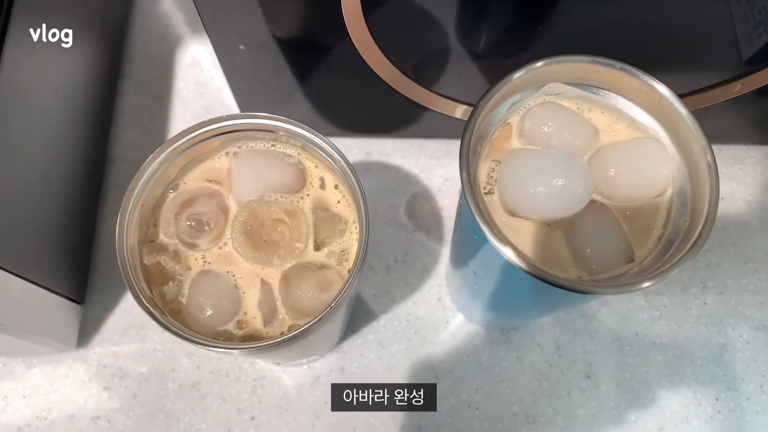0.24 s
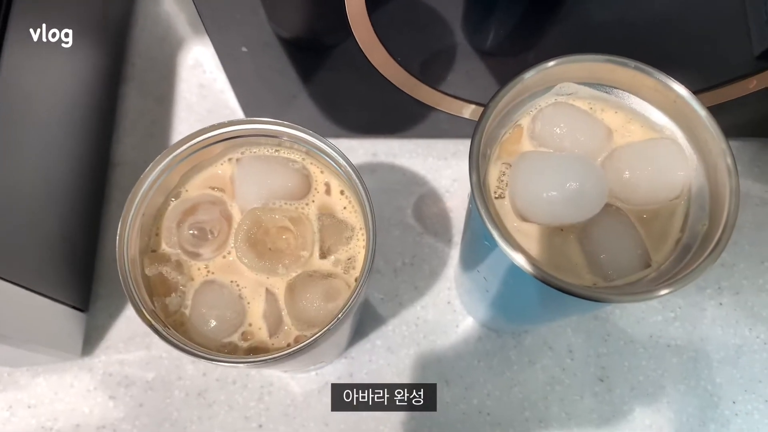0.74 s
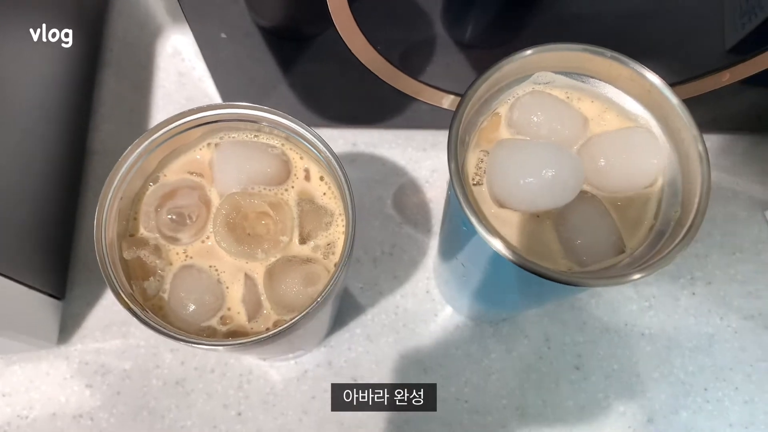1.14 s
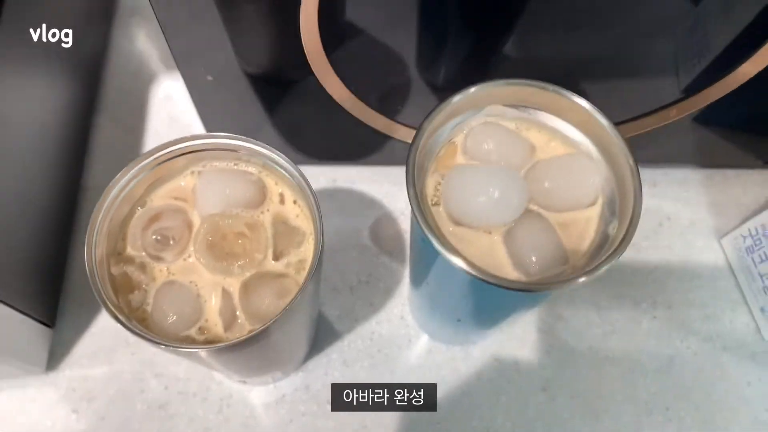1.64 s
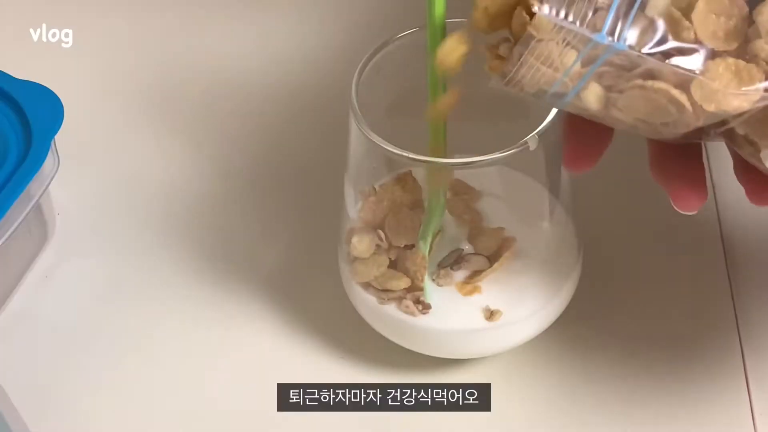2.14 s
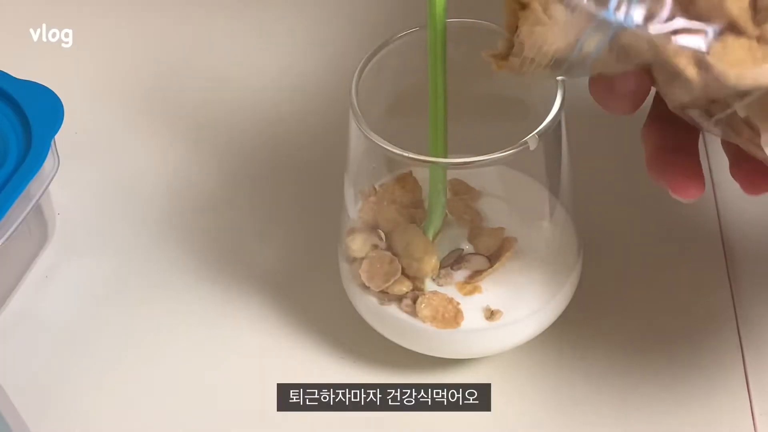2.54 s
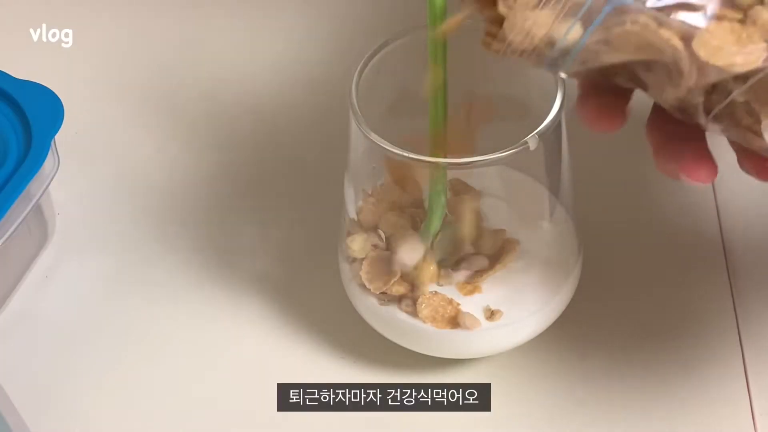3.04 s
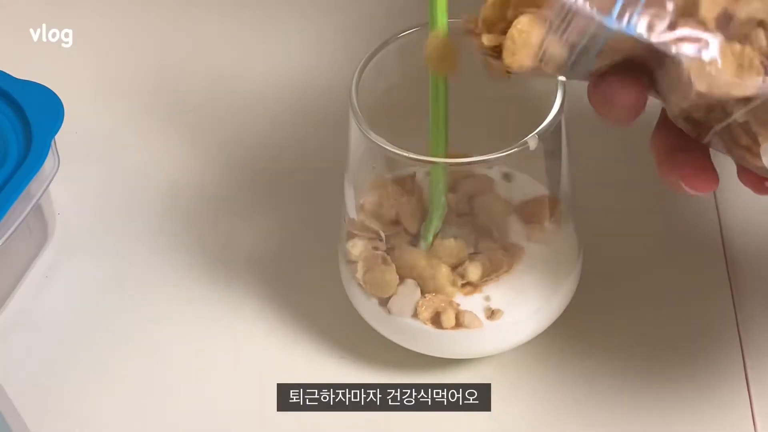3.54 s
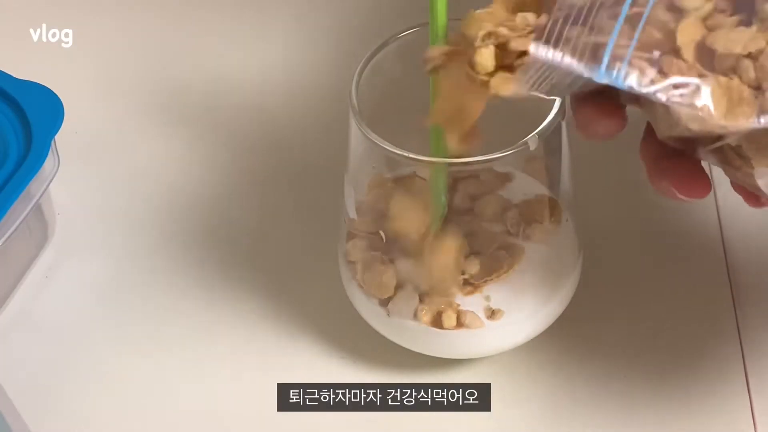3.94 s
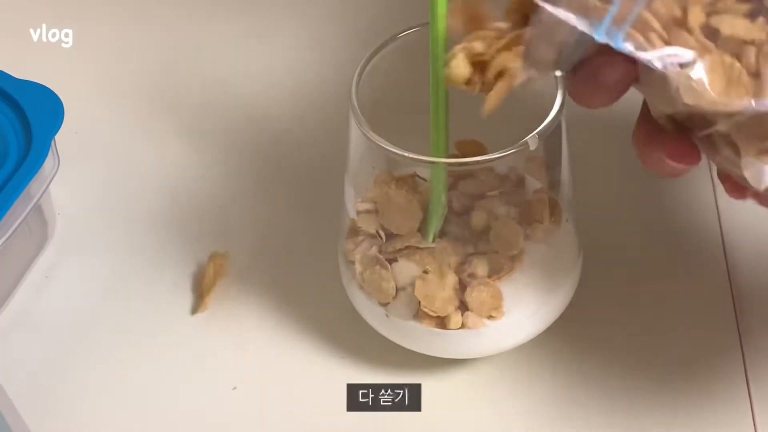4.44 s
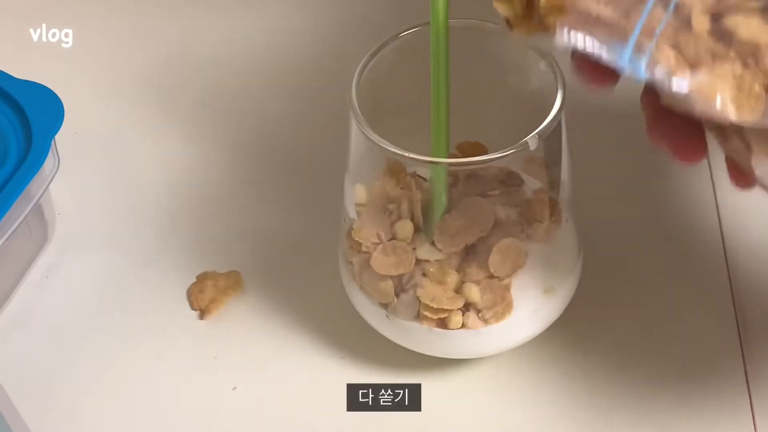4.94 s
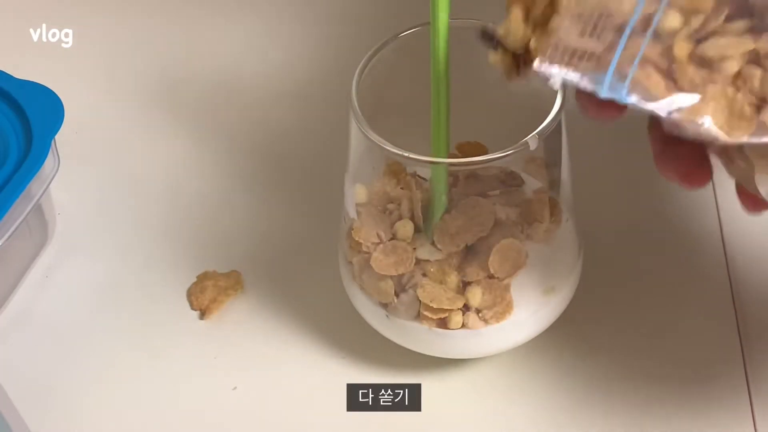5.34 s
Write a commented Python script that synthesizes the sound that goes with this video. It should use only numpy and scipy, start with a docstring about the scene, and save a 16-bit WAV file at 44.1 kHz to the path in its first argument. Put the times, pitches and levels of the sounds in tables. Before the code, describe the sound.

Close, dry kitchen sound with low air rumble: first quiet scuffs of a cup base, then a crisp pour of brittle flakes. Thin plastic film crackles with every shake, flakes crunch and patter into the glass, which rings briefly. The loudest clicks come midway; the pour then dies down to faint rustles, a low wavering hum, handling bumps and one last crunch. Small camera, two close microphones.

```python
"""First a cup is nudged softly over a kitchen counter: noise made of tiny ticks hisses at each push.
Then cereal flakes are shaken from a plastic bag into a glass: film and flakes are built from tiny damped ticks,
sharp snaps, clicks and knocks are added one by one, and the glass rings as a set of fading tones.
Late in the pour a low, fluttering hum comes and goes. Throughout, the kitchen air rumbles, with soft bumps of
handling; a small camera with two close microphone ports hears it all in a dry room."""
import sys
import numpy as np
from scipy import signal
from scipy.fft import rfft, irfft, next_fast_len
from scipy.io import wavfile

SR = 44100
rng = np.random.default_rng(int(sys.argv[2]) if len(sys.argv) > 2 else 0)


def transcribe(signal):
    """Save signal, clipped to [-1, 1], as a 16-bit WAV file at the path in sys.argv[1]."""
    frames = np.atleast_2d(signal).T
    limited = np.clip(frames, -1, 1)
    pcm = np.round(limited * 32767).astype(np.int16)
    wavfile.write(sys.argv[1], SR, pcm)


N = 245841  # length [samples]
POUR_START = 1.713  # the cup stops and the pour begins [s]
TOP_HZ = 16450  # upper band limit [Hz]

# Table levels are starting levels: settings such as level_db are added on top.
# tone colour of the crinkling film: (frequency [Hz], relative level [dB per Hz])
FILM_COLOUR = [(2000, -62.5), (4000, -26), (6800, -21), (7600, -18.5), (8200, 6.5), (9000, 3.5), (10500, 2),
               (12400, 8.5), (14300, 4), (15500, 3), (16300, -32.5)]
# tone colour of the brittle flakes: (frequency [Hz], relative level [dB per Hz])
FLAKE_COLOUR = [(200, -44.5), (900, -20.5), (1450, -9), (1900, -11.5), (2400, -10.5), (3100, -16),
                (3900, 3), (4800, -5), (5800, -2), (7400, 2.5), (9000, 3), (14000, -7)]


def amp(db):
    """Turn decibels into a gain."""
    return 10 ** (np.asarray(db) / 20)


def unit(x):
    """Scale to an rms level of 1."""
    return x / np.sqrt(np.mean(x ** 2) + 1e-20)


def along(points, hz):
    """Read a curve of (frequency [Hz], value) points on a log frequency axis."""
    f, v = np.transpose(points)
    return np.interp(np.log(hz + 1), np.log(f + 1), v)


def curves(rows):
    """Draw straight lines between timed rows: one curve for each column after the time."""
    s, *columns = np.transpose(rows)
    return [np.interp(np.arange(N) / SR, s, column) for column in columns]


def add(track, s, sound):
    """Mix a sound into a track at time s [s]."""
    part = track[round(s * SR):][:len(sound)]
    part += sound[:len(part)]


def filtered(x, response):
    """Multiply the spectrum of x by a response that depends on frequency."""
    padded_size = next_fast_len(N + SR // 2)
    hz = np.fft.rfftfreq(padded_size, 1 / SR)
    return irfft(rfft(x, padded_size) * response(hz), padded_size)[..., :N]


def coloured(x, spectrum, size=2048):
    """Give x a tone colour without sounding ahead of time; white noise keeps its power."""
    # folding the cepstrum forward in time makes the filter minimum-phase
    cepstrum = irfft(np.log(amp(along(spectrum, np.fft.rfftfreq(size, 1 / SR)))))
    cepstrum[1:size // 2] *= 2
    cepstrum[size // 2:] = 0
    kernel = irfft(np.exp(rfft(cepstrum)))
    return signal.fftconvolve(x, kernel / np.linalg.norm(kernel))[:N]


def grains(spectrum, rate, spread_db, life, bed_db, apart, size=140):
    """Many tiny damped ticks of random pitch and size on a bed of noise, with a random phase gap between ports."""
    # rate [ticks/s], life [s] to fall to 1/e, apart: how much the ports differ
    draw = rng.random((int(rate * N / SR), 3))
    t = np.arange(size) / SR
    hz = draw[:, 1:2] * TOP_HZ
    loudness_db = spread_db * np.minimum(-np.log(1 - draw[:, 2:]), 3)  # mostly small, a few loud
    decay = amp(loudness_db) * np.exp(-t / life)
    turn = apart * rng.standard_normal((len(draw), 1))
    where = ((draw[:, :1] * N).astype(int) + np.arange(size)).ravel()
    shared, across = rng.standard_normal((2, N))
    pair = []
    for sign in (1, -1):
        ticks = decay * np.sin(2 * np.pi * hz * t + sign * turn)
        crackle = np.bincount(where, ticks.ravel(), N + size)[:N]
        bed = unit(shared + sign * apart * across)
        pair.append(coloured(unit(crackle) + amp(bed_db) * bed, spectrum))
    return unit(np.array(pair))


def swells(starts, lengths, levels_db, shape):
    """Summed power of gestures that each rise, hold for their length and die away."""
    fall_per_length = 2.1  # extra seconds of fall for each second of length
    grid = np.arange(0, N / SR, .001)
    t, length = grid - starts[:, None], lengths[:, None]
    rise, fall = shape  # [s] over 60 dB
    before = np.maximum(-t, 0) / rise
    after = np.maximum(t - length, 0) / (fall + fall_per_length * length)
    power = amp(levels_db[:, None] - 60 * (before + after)) ** 2
    return np.interp(np.arange(N) / SR, grid, power.sum(0))


def ports(x, phase):
    """The two ports hear the same sound, with a phase gap that depends on frequency."""
    return filtered(x, lambda hz: np.exp(.5j * phase(hz) * np.array([[1], [-1]])))


def ambience(bump_db=1):
    """The slowly swelling rumble of the kitchen air, with soft low bumps of handling, both shaped from noise."""
    # tone colour of the air: (frequency [Hz], relative level [dB per Hz])
    air_colour = [(20, -52.5), (36, -12.5), (55, 1.5), (130, 0.5), (300, -3), (600, -8.5), (1200, -14),
                  (2500, -23), (6000, -29), (15000, -42.5)]
    # tone colour of handling: (frequency [Hz], relative level [dB per Hz])
    handling_colour = [(20, -38), (32, -20), (50, 3.5), (80, -0.5), (160, 0.5), (300, -14), (700, -16.5),
                       (15000, -59)]
    # the rumble swells and sinks: (time [s], level [dB])
    air_swell = [(0, 2), (.2, -0.5), (.3, 3), (.55, 1), (1.08, 0.5), (1.2, 0), (1.45, 1.5), (2.23, 0.5),
                 (2.6, 1), (3.7, -1.5), (4.8, -1), (5.57, 0)]
    # soft bumps: (time [s], length [s], level [dB])
    bump_rows = [(0.277, 0.07, -65), (1.412, 0.055, -63.5), (1.526, 0.039, -62.5), (2.145, 0.044, -64),
                 (4.31, 0.021, -58.5), (4.47, 0.17, -61.5), (4.767, 0.1, -64.5), (5.322, 0.089, -58.5),
                 (5.38, 0.029, -55), (5.471, 0.012, -53.5)]
    air_db, bump_shape = -66.5, (0.14, 0.095)  # level before the swell; (rise [s], fall [s]) over 60 dB
    air, handling = [unit(filtered(rng.standard_normal((2, N)), lambda hz: amp(along(spectrum, hz))))
                     for spectrum in (air_colour, handling_colour)]
    swell_db, = curves(air_swell)
    bumps = np.sqrt(swells(*np.transpose(bump_rows), bump_shape)) * handling
    return amp(air_db + swell_db) * air + amp(bump_db) * bumps


def hum(level_db=1.0, overtone_db=-26, waver_hz=4.2, flutter_db=2.5):
    """A low tone with two faint overtones swells and fades a few times, gliding and fluttering."""
    # hums: (time [s], length [s], first pitch [Hz], last pitch [Hz], level [dB])
    hum_rows = [(4.443, 0.048, 102, 105, -55.5), (4.74, 0.13, 131.6, 134, -58.5),
                (4.913, .22, 103.5, 95, -52), (5.097, 0.24, 104.7, 100, -64),
                (5.233, 0.17, 92.2, 100, -51.5), (5.346, 0.085, 119.6, 156, -51)]
    track = np.zeros(N)
    for s, length, first_hz, last_hz, db in hum_rows:
        u = np.linspace(0, 1, int(length * SR))  # progress from start to end
        waver = waver_hz * np.interp(u, np.linspace(0, 1, 6), rng.standard_normal(6))
        phase = 2 * np.pi * np.cumsum(first_hz + (last_hz - first_hz) * u + waver) / SR
        tone = np.sin(phase) + amp(overtone_db) * (np.sin(2 * phase) + np.sin(3 * phase))
        flutter = np.interp(u * length * 50, np.arange(16), rng.standard_normal(16))  # 50 values a second
        add(track, s, amp(db + level_db + flutter_db * flutter) * np.sin(np.pi * u) * tone)
    return track


def room(x, size=16384):
    """Each port gets its own short fading noise tail as the room's echo, drawn anew for every block of sound."""
    # how long the room rings: (frequency [Hz], t60 [s])
    room_decay = [(200, 0.045), (2000, 0.058), (8000, 0.055), (16000, 0.09)]
    wet, padded = np.zeros((2, N)), np.pad(x, (0, size))
    for start in range(0, N, size):
        hz, t, z = signal.stft(rng.standard_normal((2, size)), SR, nperseg=256)
        fading = z * amp(-60 * t / along(room_decay, hz)[:, None])
        tail = signal.istft(fading, SR, nperseg=256)[1]
        for port, answer in zip(wet, tail):
            echo = signal.fftconvolve(padded[start:start + size], answer / np.linalg.norm(answer))
            add(port, start / SR, echo)
    return wet


def cup(level_db=1):
    """The base of a cup hisses over the smooth counter at each push, until the pour starts."""
    # pushes: (time [s], length [s], level [dB])
    push_rows = [(0, 0.046, -63.5), (0.11, 0.052, -61), (0.266, 0.13, -58.5), (0.4, 0.095, -54.5),
                 (0.569, 0.0083, -68), (0.708, 0.092, -57), (0.863, 0.057, -56), (1.076, 0.006, -61)]
    # tone colour of the hiss: (frequency [Hz], relative level [dB per Hz])
    hiss_colour = [(2000, -45), (7400, -65), (8100, 4.5), (10000, 4), (12500, 2), (15600, -1), (16200, -54)]
    push_shape, rest_db = (0.055, 0.042), -79  # (rise [s], fall [s]) over 60 dB; faint hiss between pushes
    level = np.sqrt(swells(*np.transpose(push_rows), push_shape) + amp(rest_db) ** 2)
    before_pour = np.arange(N) < POUR_START * SR
    hiss = grains(hiss_colour, rate=1500, spread_db=2, life=.0005, bed_db=6, apart=.15)
    return amp(level_db) * level * before_pour * hiss


def knocks(level_db=-10, t60=0.046, rise=0.0052, width=0.47):
    """The mass of flakes bumps in the bag: a brief, dull burst of noise, each around its own pitch."""
    # knocks: (time [s], level [dB], pitch [Hz])
    knock_rows = [(1.713, -63.5, 597), (1.831, -56.5, 795), (2.014, -54.5, 635), (2.152, -51, 900),
                  (2.18, -53.5, 730), (2.324, -52.5, 696), (2.4, -54, 860), (2.422, -52.5, 700),
                  (2.536, -61, 470), (2.773, -44, 1100), (2.792, -49, 795), (3.003, -61, 520),
                  (3.115, -59, 1020), (3.357, -60, 790), (3.873, -51, 415), (4.13, -49, 660),
                  (4.316, -50.5, 495), (4.486, -58.5, 430), (4.545, -56.5, 360), (4.599, -56, 400),
                  (5.47, -47.5, 820), (5.475, -48.5, 300)]
    track, t = np.zeros(N), np.arange(SR // 10) / SR
    shape = (1 - np.exp(-t / rise)) * amp(-60 * t / t60)
    for s, db, hz in knock_rows:
        band = signal.butter(2, [hz / (1 + width), hz * (1 + width)], "band", fs=SR)
        burst = shape * rng.standard_normal(len(t))
        add(track, s, amp(db + level_db) * unit(signal.lfilter(*band, burst)))
    return track


def jolts(ring_db=2, sharpness=6):
    """A clump of flakes gathers and stops short with a crunch that rings at its own pitch."""
    # jolts: (time [s], level [dB], rise by a factor e [s], t60 [s], lowest frequency [Hz], ringing pitch [Hz])
    jolt_rows = [(1.714, -54, .0003, 0.034, 500, 2720), (1.75, -61, .001, 0.18, 600, 1400),
                 (1.831, -43, .0017, 0.044, 700, 1380), (2.165, -53, 0.011, 0.043, 600, 1330),
                 (2.423, -38, 0.0092, 0.024, 700, 1320), (2.536, -34.5, 0.00087, 0.023, 1100, 3850),
                 (2.764, -38, .00045, 0.022, 1200, 4100), (2.774, -28.5, 0.00062, 0.021, 800, 1210),
                 (2.795, -40.5, 0.03, .19, 600, 2470), (3.357, -36, .0008, 0.054, 1200, 1970),
                 (4.127, -30, 0.00076, 0.053, 700, 2300), (5.475, -36.5, .017, .045, 504, 1400)]
    # tone colour of a clump: (frequency [Hz], relative level [dB per Hz])
    clump_colour = [(30, -52.5), (100, -32), (350, -17), (800, -7.5), (1400, 0), (2500, 1.5), (4200, 4.5),
                    (7000, -9.5), (15000, 6.5)]
    track, t = np.zeros((2, N)), np.arange(N) / SR
    crunch = grains(clump_colour, rate=1600, spread_db=3, life=.0002, bed_db=-4, apart=.5)
    for s, db, rise, t60, low_hz, ring_hz in jolt_rows:
        level = amp(db - 60 * np.maximum(t - s, 0) / t60) * np.exp(np.minimum(t - s, 0) / rise)
        clump = signal.lfilter(*signal.butter(2, low_hz, "high", fs=SR), crunch)  # small clumps lack the low end
        ring = signal.lfilter(*signal.iirpeak(ring_hz, sharpness, fs=SR), clump)
        track += level * (clump + amp(ring_db) * ring)
    return track


def snaps(edge_db=0, body_db=2, ring_share=0.31, rough_db=4, count=5):
    """Film crumples or a flake cracks: a ragged burst of noise through resonances new for each snap."""
    # snaps: (time [s], level [dB], flake body relative to that level [dB], length at full strength [s])
    snap_rows = [(1.714, -48, -7, .002), (1.7305, -45.5, -6, 0.0011), (1.749, -42, -12, .0007),
                 (1.771, -39, -15, 0.0065), (1.946, -40, -14, 0.0032), (1.9624, -41.5, -20, 0.0025),
                 (2.0877, -42, -9.5, 0.0014), (2.117, -42, -13, 0.0017), (2.128, -48, -13, .0025),
                 (2.145, -31, -18, .0016), (2.1737, -29.5, -15, 0.0052), (2.256, -38, -34, 0.0012),
                 (2.297, -42, -16, 0.0016), (2.307, -35, -10.5, 0.014), (2.5337, -37.5, -11, 0.0025),
                 (2.723, -39.5, -14.5, .0025), (2.7276, -35.5, -16.5, 0.0018), (2.84, -38, -17, .004),
                 (2.923, -44, -18, .0015), (2.94, -45, -8, 0.0015), (2.955, -48, -6, 0.0014),
                 (2.973, -38.5, -10.5, .0044), (2.9986, -30.5, -13.5, 0.0054), (3.006, -32, -21, 0.0031),
                 (3.013, -36, -26, 0.0051), (3.0325, -32.5, -13, 0.0043), (3.0783, -34, -14, 0.005),
                 (3.105, -33, -14, .0016), (3.112, -34, -15, 0.0027), (3.1158, -27.5, -17.5, 0.0042),
                 (3.388, -40.5, -33, 0.003), (3.425, -35.5, -20, 0.0033), (3.442, -33, -26, .0035),
                 (3.544, -39.5, -24, .0037), (3.554, -46, -24, .0018), (3.568, -39, -22.5, 0.0046),
                 (3.689, -45.5, -37, 0.0035), (3.8234, -41.5, -23, 0.0034), (3.8694, -41.5, -6.5, 0.0037),
                 (3.8936, -40.5, -15.5, 0.0016), (3.983, -42.5, -16.5, 0.0074), (4.065, -42, -23.5, 0.0034),
                 (4.1235, -37, -9.5, 0.0035), (4.139, -39, -28, 0.0024), (4.145, -42, -30, 0.0017),
                 (4.2646, -49, -4, 0.00091), (4.271, -41.5, -8, 0.0047), (4.282, -47, -7, .0013),
                 (4.4146, -48.5, -21, 0.0012), (4.4828, -38.5, -8.5, 0.0056), (4.5295, -35, -16, 0.0011),
                 (4.543, -39, -10.5, 0.0046), (4.557, -36, -11, 0.006), (4.595, -35, -14, 0.0049),
                 (4.674, -68, 3, 0.0017)]
    fall_s, tail_db, tail_s, ring_s = 0.0037, -28.5, 0.049, 0.033  # burst t60; after-rustle level, t60; ring t60
    front_db, front_s = 5, 0.00054  # the start of a snap is the hardest
    edge, body = np.zeros(N), np.zeros((2, N))
    t = np.arange(SR // 20) / SR
    knots = t[::30]
    for s, db, rel_db, length in snap_rows:
        after = np.maximum(t - length, 0)
        rough = np.interp(t, knots, rng.standard_normal(len(knots)))
        ragged = amp(front_db * np.exp(-t / front_s) + rough_db * rough)
        fading = amp(-60 * after / fall_s) + amp(tail_db - 60 * after / tail_s)
        burst = rng.standard_normal(len(t)) * ragged * fading
        film_hz = rng.uniform(8000, 15500, (count, 1))
        flake_hz = rng.uniform(3500, 7800, (count, 1))
        layers = [(edge, film_hz, db + edge_db)]
        layers += [(port, flake_hz, db + rel_db + body_db) for port in body]
        for track, hz, level in layers:
            tones = rng.standard_normal((count, 1)) * np.sin(2 * np.pi * hz * t)
            modes = tones.sum(0) * amp(-60 * t / ring_s)
            ring = unit(signal.fftconvolve(burst, modes)[:len(t)])
            add(track, s, amp(level) * unit(unit(burst) + ring_share * ring))
    return coloured(edge, FILM_COLOUR) + np.array([coloured(port, FLAKE_COLOUR) for port in body])


def small_clicks(crinkle):
    """Lesser clicks at random times, as strong as the film is being worked: (time, peak, pitch, rise) rows."""
    rate, rise = 57, 0.00013  # [clicks/s], [s]
    level_db, scatter_db = -0.5, -0.5  # peak relative to the film's gain; rms scatter
    centre_hz, spread_hz = 11000, 1400
    pour_length = N / SR - POUR_START
    draw = rng.random((int(rate * pour_length), 3))
    s = POUR_START + draw[:, 0] * pour_length
    scatter = 2 * draw[:, 1:] - 1  # from -1 to 1
    film_db = 20 * np.log10(crinkle[(s * SR).astype(int)])
    db = film_db + level_db + scatter_db * np.sqrt(3) * scatter[:, 0]
    return list(zip(s, db, centre_hz + spread_hz * scatter[:, 1], np.full(len(s), rise)))


def clicks(crinkle, level_db=-2.5):
    """A crease flips or a flake's edge hits: a few cycles of two partials, then a faint shiver of the film."""
    # single sharp clicks: (time of peak [s], peak level [dB], pitch [Hz], rise [s])
    click_rows = [(1.9468, -16, 13100, 0.00032), (2.0139, -23.5, 13300, 0.00018),
                  (2.1015, -24, 11000, .0003), (2.2523, -25, 12500, 0.00022), (2.5359, -25, 10650, 0.00015),
                  (2.7648, -24, 5000, 0.00021), (2.7723, -17.5, 3580, 0.00019), (2.8986, -22, 12900, .0003),
                  (2.9044, -22, 12000, 0.0002), (3.0666, -15, 10900, 0.00012),
                  (3.3263, -17.5, 12800, 0.00023), (3.4031, -8, 10800, 0.0003),
                  (3.4263, -12, 11300, 0.00023), (3.6086, -2, 11740, 0.00025), (3.6339, -2, 12400, 0.00023),
                  (3.9284, -7, 11000, 0.00016), (3.9415, -10, 13500, 0.00016), (3.9456, -2, 12300, 0.00021),
                  (3.9585, -9, 12600, 0.000092), (3.967, -18.5, 12500, 0.00015),
                  (3.981, -15, 13200, 0.00018), (3.994, -20.5, 10600, 0.00015),
                  (4.0108, -20.5, 11600, .00025), (4.033, -10.5, 11750, 0.00045),
                  (4.0851, -16, 13200, .00025), (4.0897, -18, 12200, .00025),
                  (4.126, -19.5, 11900, 0.000203), (4.127, -23.5, 5680, .0007), (4.1312, -3.5, 8040, .0006),
                  (4.137, -20.5, 6100, 0.0002), (4.178, -16.5, 11300, 0.00024),
                  (4.1976, -7.5, 11500, .00016), (4.2101, -15.5, 10800, 0.00016),
                  (4.2791, -5.5, 10200, 0.00036), (4.2874, -10.5, 11500, 0.00014),
                  (4.3456, -18, 11300, 0.00045), (4.385, -19.5, 11300, 0.00033),
                  (4.4225, -15, 10300, 0.00033), (4.5016, -5, 12600, 0.00017),
                  (4.507, -10.5, 10400, 0.00016), (4.6202, -28, 10800, .00016)]
    under_db, under_ratio = -10.5, 0.82  # lower partial: level, share of the pitch
    tail_db, tail_s = -18.5, 0.032  # shiver: level relative to the click, t60
    track, shiver, t = np.zeros(N), np.zeros(N), np.arange(SR // 20) / SR
    for s, db, hz, rise in list(click_rows) + small_clicks(crinkle):
        shape = (t / rise) ** 2 * np.exp(2 - 2 * t / rise)
        phase = 2 * np.pi * hz * (t - rise)
        partials = np.cos(phase) + amp(under_db) * np.sin(under_ratio * phase)
        add(track, s - rise, amp(db) * shape * partials)
        add(shiver, s, amp(db + tail_db - 60 * t / tail_s) * rng.standard_normal(len(t)))
    return amp(level_db) * (track + coloured(shiver, FILM_COLOUR))


def shaking():
    """Gains of the film, the shifting flakes and the landing flakes: every shake drives all three, over a squeeze."""
    # shakes and tips of the bag:
    # (time [s], length [s], film level [dB], flakes shifting in the bag [dB], flakes landing on the heap [dB])
    shake_rows = [(1.719, 0.024, -38.5, -60, -51), (1.747, 0.056, -34.5, -53, -45.5),
                  (1.815, 0.05, -48, -52.5, -53.5), (1.907, 0.0057, -61, -53.5, -49.5),
                  (1.94, 0.072, -41, -52, -48), (2.089, 0.052, -44, -55.5, -49),
                  (2.141, 0.039, -29, -49.5, -42.5), (2.271, 0.018, -49, -61.5, -48.5),
                  (2.305, 0.024, -31, -52, -49), (2.412, 0.015, -38, -51, -47),
                  (2.427, 0.05, -36.5, -64, -58), (2.763, 0.053, -37, -54.5, -43),
                  (2.933, .1, -35, -59, -48), (3.084, 0.08, -34, -58, -43.5),
                  (3.339, 0.07, -36.5, -64.5, -53), (3.426, 0.018, -21.5, -71, -49.5),
                  (3.847, .015, -41, -72, -43.5), (3.865, 0.018, -28, -50, -49),
                  (3.895, 0.075, -27.5, -64, -52.5), (4.131, 0.0032, -21, -49.5, -41.5),
                  (4.274, 0.0096, -27, -51, -34.5), (4.298, 0.029, -33, -50.5, -46.5),
                  (4.472, 0.091, -32.5, -53, -43), (4.528, 0.071, -33, -57, -37),
                  (4.602, 0.078, -59, -66.5, -52), (4.784, 0.21, -57.5, -64, -63),
                  (5.153, 0.028, -59, -64, -69), (5.206, 0.18, -72, -66.5, -83),
                  (5.297, 0.034, -47.5, -55, -56), (5.473, 0.011, -37.5, -45.5, -42.5)]
    # the hand's squeeze keeps the film crackling between shakes:
    # (time [s], film level [dB], more or less spilling [dB])
    squeeze_rows = [(1.72, -62, 0), (2.39, -61, 2), (2.5, -39.5, 5.5), (2.57, -46.5, 15.5), (2.62, -37, 7),
                    (2.69, -52, 9), (2.75, -42, 14), (3.3, -35.5, 1), (3.52, -38, -22), (3.65, -47.5, -15),
                    (3.71, -36.5, -2), (3.8, -39.5, -36), (4.08, -46.5, 1.5), (4.25, -48.5, 5.5),
                    (4.36, -43, -4), (4.62, -46, 6), (4.76, -87, 17), (5.57, -63, -2)]
    # (rise [s], fall [s]) over 60 dB for each part
    film_shape, shift_shape, heap_shape = (0.022, 0.11), (0.11, 0.0057), (0.058, 0.032)
    stir_db, spill_db = -33.5, -24  # flakes the squeeze stirs in the bag and spills, relative to the film
    s, length, film_db, shift_db, heap_db = np.transpose(shake_rows)
    squeeze_db, more_spill_db = curves(squeeze_rows)
    parts = [(film_db, film_shape, 0),
             (shift_db, shift_shape, stir_db),
             (heap_db, heap_shape, spill_db + more_spill_db)]
    return [np.sqrt(swells(s, length, db, shape) + amp(squeeze_db + between) ** 2)
            for db, shape, between in parts]


def bag(crinkle, shift, crinkle_db=-5.0, shift_db=1):
    """The film crinkles while the flakes slide inside it: two streams of tiny ticks."""
    # tone colour of the sliding flakes: (frequency [Hz], relative level [dB per Hz])
    bulk_colour = [(30, -46), (100, -7), (230, -8.5), (420, 2), (600, -1.5), (820, 2), (1130, -2.5),
                   (1380, 1), (1650, -10), (2050, -1), (3000, -4), (6000, -2.5), (12000, -39.5)]
    film = grains(FILM_COLOUR, rate=1400, spread_db=4, life=.00015, bed_db=-6, apart=.3)
    flakes = grains(bulk_colour, rate=900, spread_db=3.5, life=.0001, bed_db=-6, apart=.4)
    return amp(crinkle_db) * crinkle * film + amp(shift_db) * shift * flakes


def glass_ring(centre_hz, fall_db):
    """Fading tones of the glass, weaker by fall_db per octave away from where the blow is strongest."""
    # ringing tones of the glass: (frequency [Hz], relative level [dB], t60 [s])
    glass_modes = [(1350, -15, .13), (3720, -15, .11), (4200, -19.5, .065), (5530, -9, 0.068),
                   (5790, -7, .079), (6100, -14, 0.053), (7347, 0.5, 0.06), (7950, 0, 0.087),
                   (8440, -6, 0.083), (11900, -8.5, 0.086), (13575, -10, .071)]
    t = np.arange(SR // 4) / SR
    return sum(amp(db - fall_db * abs(np.log2(hz / centre_hz)) - 60 * t / t60) * np.sin(2 * np.pi * hz * t)
               for hz, db, t60 in glass_modes)


def glass(trickle, trickle_db=-2, ring_db=-10, strike_db=-4):
    """Flakes patter on the heap and keep the glass faintly ringing; some hit its wall squarely."""
    # flakes striking the wall: (time [s], level [dB], frequency the blow excites most [Hz])
    strike_rows = [(1.773, -26.5, 7400), (2.309, -23.5, 7300), (3.115, -31, 4200), (3.867, -27, 6960),
                   (4.1249, -25, 5780), (4.1305, -24.5, 9260), (4.271, -29, 6000), (4.281, -29.5, 7500),
                   (4.483, -29, 7050), (4.547, -27.5, 7400)]
    patter = trickle * grains(FLAKE_COLOUR, rate=600, spread_db=5, life=.0002, bed_db=-8, apart=.55)
    ring = glass_ring(centre_hz=7000, fall_db=0)
    ringing = signal.fftconvolve(patter, ring[None] / np.linalg.norm(ring), axes=1)[:, :N]
    ticks = np.zeros(N)
    damping = amp(-60 * np.arange(len(ring)) / SR / 0.19)  # the flakes lean on the wall and damp it
    for s, db, hz in strike_rows:
        add(ticks, s, amp(db + strike_db) * damping * glass_ring(hz, fall_db=19.5))
    return amp(trickle_db) * patter + amp(ring_db) * ringing + ticks


def resonance(f, hz, width_hz):
    """Response of one resonance, 1 at its centre."""
    return 1j * f * width_hz / (hz ** 2 - f ** 2 + 1j * f * width_hz)


def hollow(x):
    """The air in the glass, stirred by the moving flakes, adds its resonances to the sound."""
    # air resonances: (frequency [Hz], width [Hz], level [dB])
    air_modes = [(454, 46, -6), (790, 19, -4), (1374, 49, -4)]
    return x + filtered(x, lambda f: sum(amp(db) * resonance(f, hz, width) for hz, width, db in air_modes))


def scene():
    """The cup's slide reaches the right port first; the pour follows, and the room answers both."""
    # phase gap between the ports for the pour: (frequency [Hz], lead of the left port [radians])
    port_phase = [(1250, 0), (1750, -2.4), (2100, -3.1), (3000, -3.1), (4000, -4), (6000, -6.3),
                  (9600, -3.1), (13300, 0), (16500, 3.1)]
    # level of the room's answer: (frequency [Hz], level [dB])
    wet_level = [(300, -23), (1300, 1.5), (2200, -1), (5000, 0), (8500, -10), (15000, -15.5)]
    crinkle, shift, trickle = shaking()
    pour = hollow(bag(crinkle, shift) + glass(trickle))
    pour = pour + snaps() + clicks(crinkle) + jolts() + knocks()
    pour = pour * (np.arange(N) >= POUR_START * SR)
    slide = cup()
    direct = ports(pour, lambda hz: np.interp(hz, *np.transpose(port_phase)))
    direct += ports(slide, lambda hz: -2 * np.pi * (hz - 11000) * .000217)  # left port later by 0.217 ms
    echo = filtered(room((pour + slide).mean(0)), lambda hz: amp(along(wet_level, hz)))
    return direct + echo + hum() + ambience()


def record(dry, mono_hz=1000):
    """The camera folds the bass to mono and cuts steeply above its band limit."""
    mid = (dry[0] + dry[1]) / 2
    side = filtered((dry[0] - dry[1]) / 2, lambda hz: 1 - 1 / (1 + (hz / mono_hz) ** 4))
    return filtered(np.array([mid + side, mid - side]), lambda hz: 1 / (1 + (hz / TOP_HZ) ** 100))


dry = scene()
out = record(dry)
transcribe(out)
```